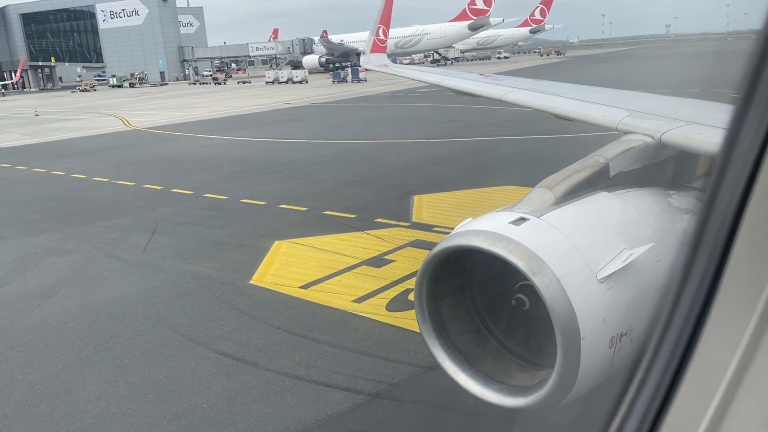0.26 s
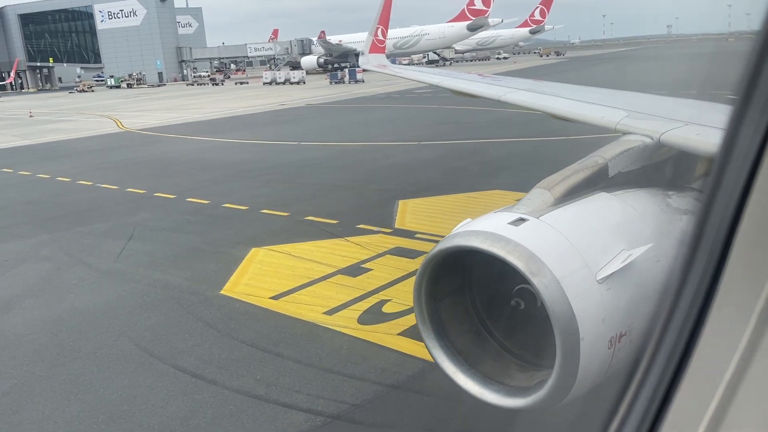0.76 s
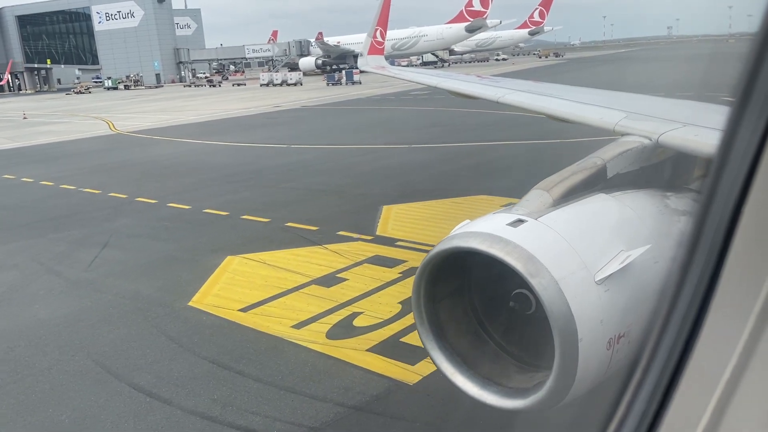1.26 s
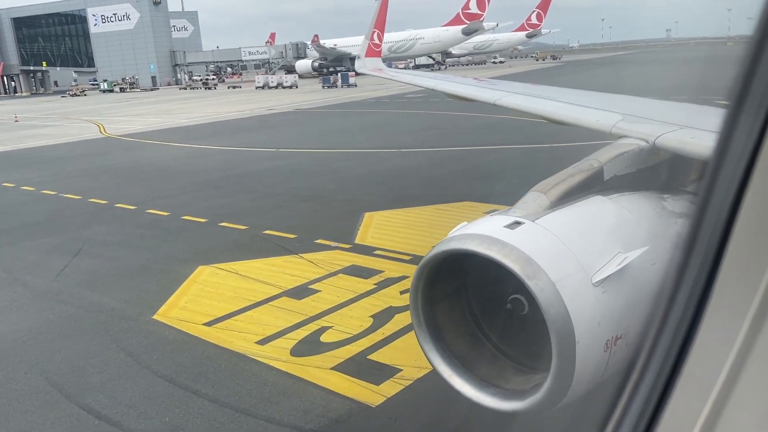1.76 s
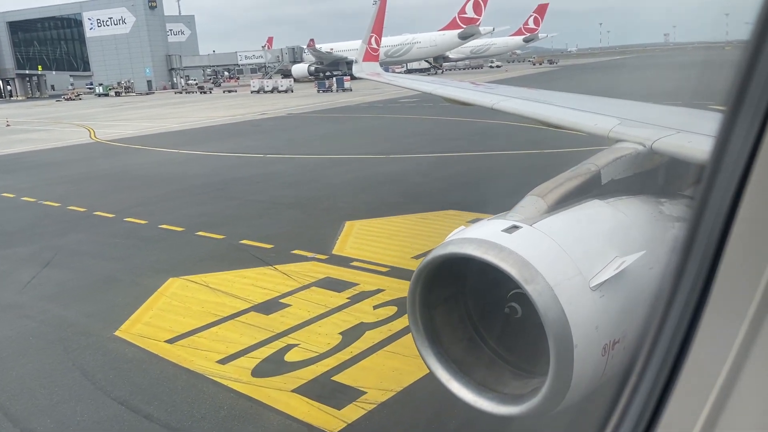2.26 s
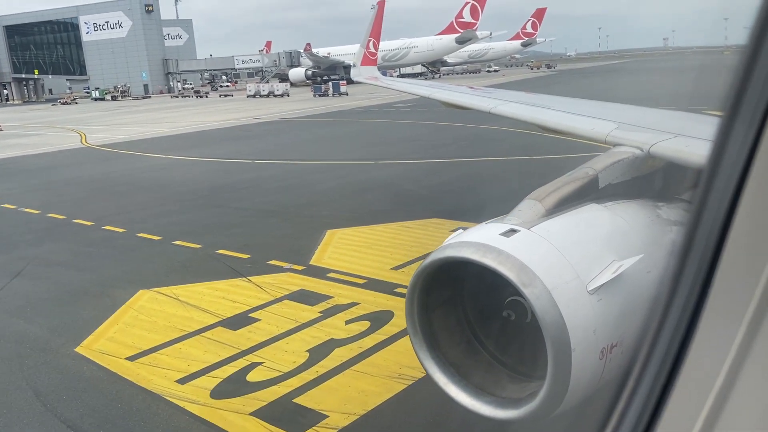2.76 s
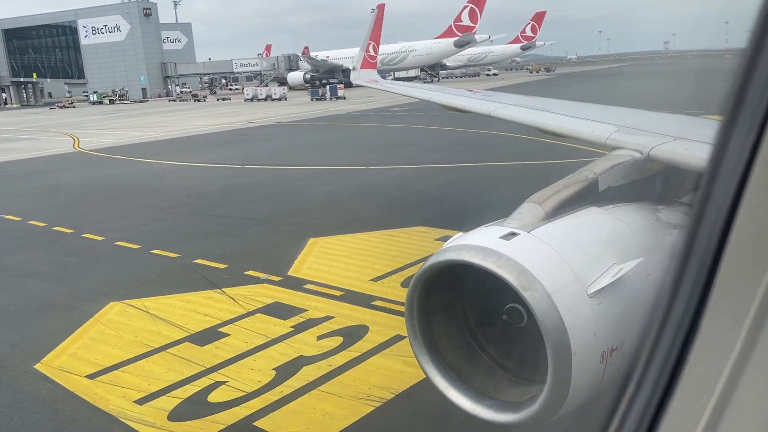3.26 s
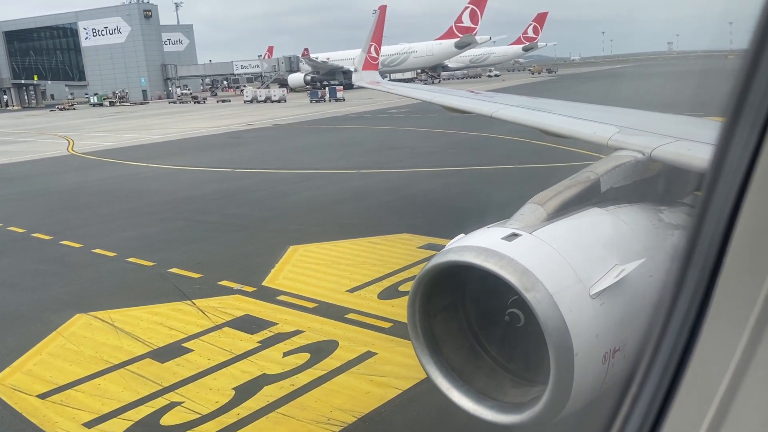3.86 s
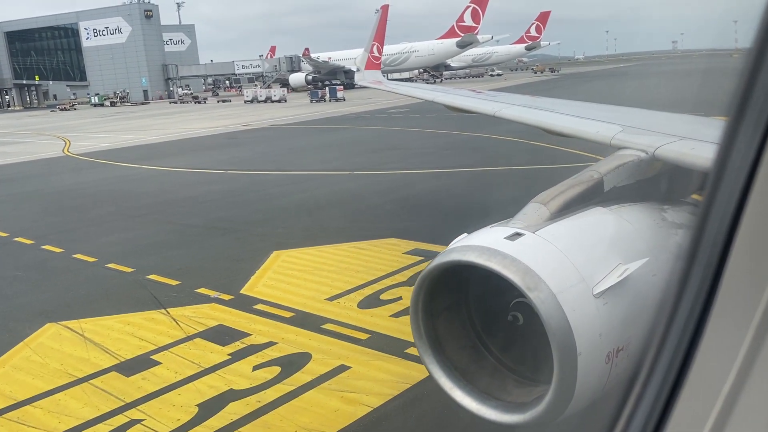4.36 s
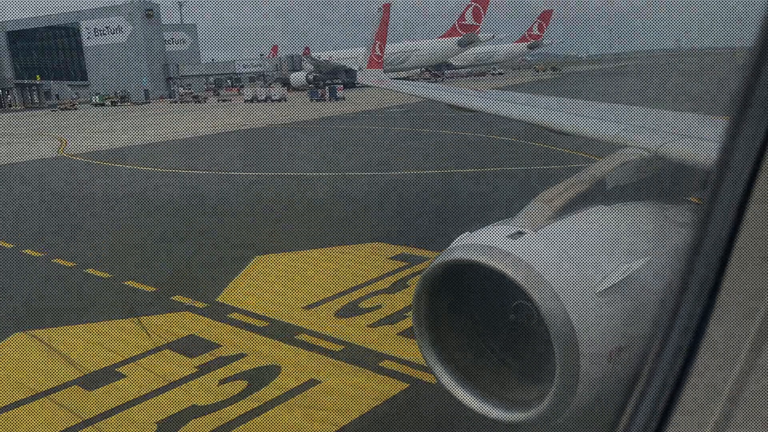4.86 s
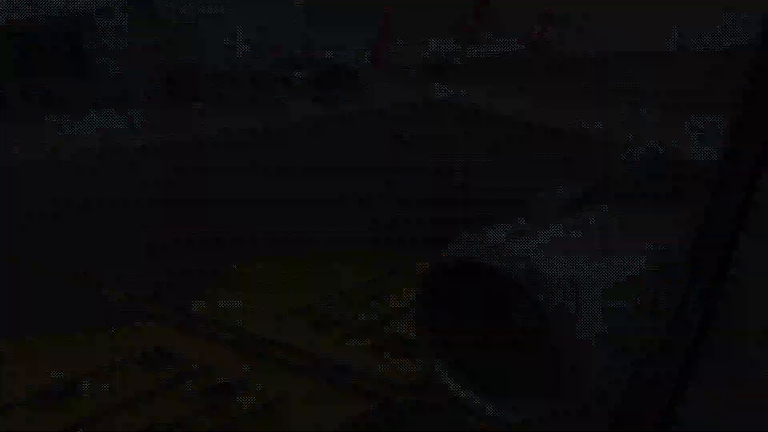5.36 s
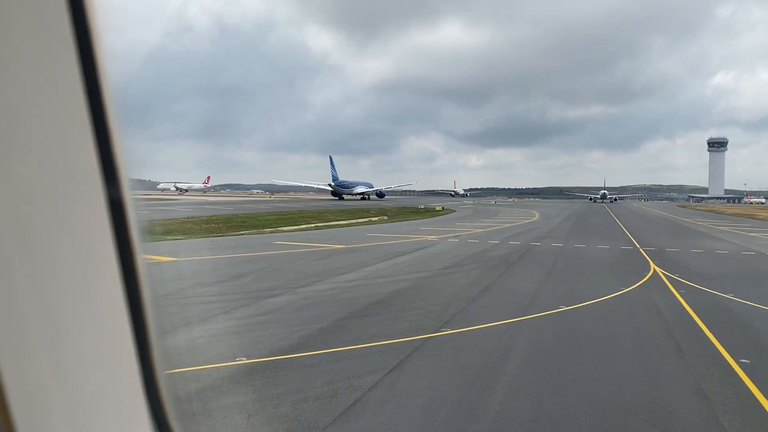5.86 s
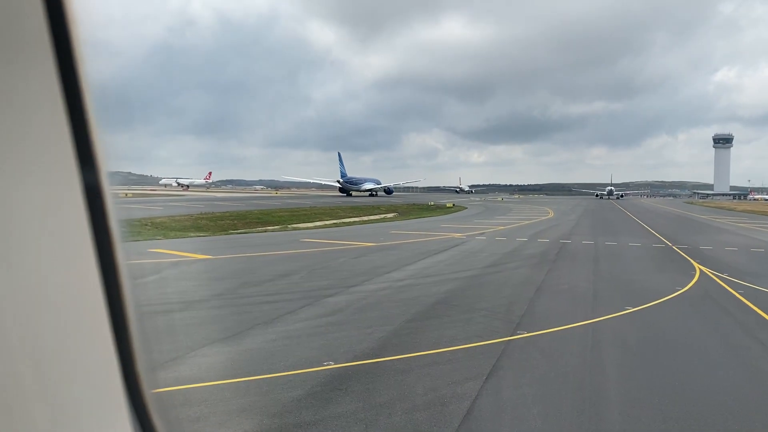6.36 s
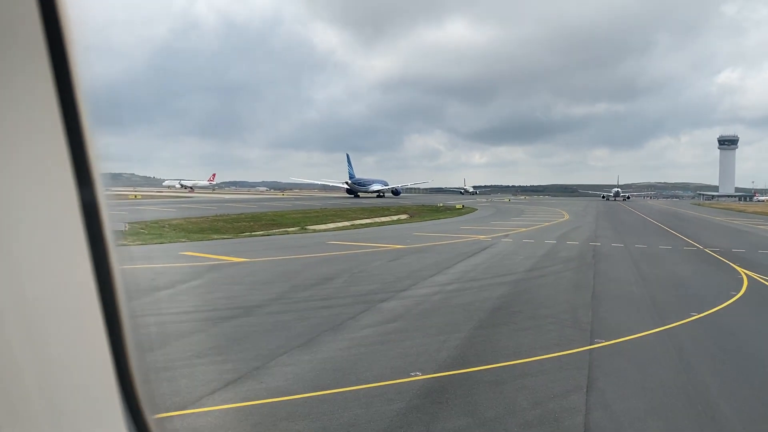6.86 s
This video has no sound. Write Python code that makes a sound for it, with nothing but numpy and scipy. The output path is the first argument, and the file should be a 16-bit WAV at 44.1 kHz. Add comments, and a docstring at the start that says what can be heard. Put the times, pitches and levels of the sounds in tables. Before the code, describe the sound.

From 0 to about 5.5 seconds we sit beside a jet engine inside a taxiing airliner. A deep throbbing hum creeps slightly upward in pitch beneath a resonant, steady roar, leaning left. Overhead air hisses with breathy whistles, and a thin high fan note shimmers. Light cloth rustles and tiny plastic ticks occur close by, with a sharper tick and knock at 1.8. A rough rush swells around 2.7 to 3.8, dips at 4.1, and partly returns. A loud cluster of clacks strikes at 4.7, with smaller knocks and a crisp rustle from 5.1 to 5.4. After a tiny silence at 5.5, a quieter seat appears: even tyre rumble, low hum and smoother vent hiss. Soft low jolts follow, knocks at 6.4 and 6.6, the deepest booms at 6.7 to 6.8, and a brief, very high squeak at 6.9.

```python
"""Two window seats in a taxiing jet airliner

First comes the seat by the engine, then after a tiny silent gap a quieter seat where the wheels rumble.
The engines' deep hum is made of sine tones; roar, rush, rumble and hissing air are coloured noise.
Fans and equipment whine as wavering sines, and bumps set off low notes that boom and die away.
Clacks, rustles and ticks are short bursts of noise; the trim's one squeak is a tone with a bending pitch."""
import sys
import numpy as np
from scipy import signal
from scipy.fft import rfft, irfft
from scipy.io import wavfile

SR = 44100
rng = np.random.default_rng(int(sys.argv[2]) if len(sys.argv) > 2 else 0)


def generate_wav(signal):
    """Clip the signal to [-1, 1] and save it as 16-bit WAV at the path in sys.argv[1]."""
    frames = np.transpose(np.atleast_2d(signal))
    scaled = np.clip(frames, -1, 1) * 32767
    pcm = np.round(scaled).astype(np.int16)
    wavfile.write(sys.argv[1], SR, pcm)


N = 313992
T = np.arange(N) / SR  # time in seconds
HZ = np.maximum(np.fft.rfftfreq(N, 1 / SR), 1)  # frequency of each spectrum bin

# how far the sound leans to the left ear at each seat: (pitch_hz, left_minus_right_db)
ENGINE_SEAT_LEAN = [(60, 2.01), (110, 2.98), (200, 4.8), (380, 2.78), (700, 6.97), (1290, 2.67),
                    (2380, 1.27), (4400, 2.9), (8120, 0.5), (15000, 0)]
QUIET_SEAT_LEAN = [(60, 3), (110, 1.5), (200, 2.5), (380, 3), (700, 0.5), (1290, -3), (2380, -2.5),
                   (4400, 0.5), (8120, 0), (15000, -3)]
# how alike the two ears are, 1 = same, below 0 = opposed: (pitch_hz, likeness)
ENGINE_SEAT_LIKENESS = [(60, 1), (130, 0.77), (290, 1), (640, 0.59), (1410, 0.01), (3100, 0.82),
                        (6820, 0.22), (15000, 0.28)]
QUIET_SEAT_LIKENESS = [(60, 0.94), (130, 1), (290, 0.81), (640, 0.23), (1410, -0.26), (3100, 0.11),
                       (6820, -0.056), (15000, -0.15)]


def undb(db):
    """Turn decibels into gain."""
    return 10 ** (np.asarray(db) / 20)


def unit(pair):
    """Scale a stereo pair so that the average of its two ears has rms 1."""
    return pair / np.std(pair.mean(axis=0))


def curves(rows):
    """Join the points of a time table by straight lines, one curve for each column."""
    seconds, *columns = np.transpose(rows)
    return [np.interp(T, seconds, column) for column in columns]


def across(points):
    """Spread a (pitch_hz, value) table over all frequencies."""
    hz, value = np.transpose(points)
    return np.interp(np.log(HZ), np.log(hz), value)


def pan(lean_db):
    """Give left and right gains for a level difference between the ears."""
    return undb(np.array([[1], [-1]]) * lean_db / 2)


def steep(edge_hz):
    """Give the gain of a steep low-pass, which is one half at its edge."""
    return 1 / (1 + (HZ / edge_hz) ** 8)


def walk(rate_hz):
    """Wander at random with spread 1, mostly slower than the given rate."""
    spectrum = rfft(rng.standard_normal(N)) / (1 + (HZ / rate_hz) ** 4)
    path = irfft(spectrum, N)
    return (path - path.mean()) / path.std()


def ripple(spacing_hz):
    """Draw a random curve over frequency with spread near 1, as many reflections make."""
    heights = rng.standard_normal(4096)
    return np.interp(HZ, spacing_hz * np.arange(len(heights)), heights)


def resonances(modes):
    """Add up the boost in dB that resonances (pitch_hz, width_hz, boost_db) give each frequency."""
    return sum(db / (1 + (2 * (HZ - hz) / width) ** 2) for hz, width, db in modes)


def noise(colour_db, likeness, lean_db=0):
    """Make coloured stereo noise; the ears differ by diffuse sound and by echoes of the shared sound."""
    mid, diffuse = rfft(rng.standard_normal((2, N)))
    echo_share = 0.75 * (1 - steep(500))  # the bass has no echoes
    echoes = mid * np.exp(1j * np.pi * ripple(150))
    side = np.sqrt(1 - echo_share) * diffuse + np.sqrt(echo_share) * echoes
    alike = np.clip(likeness, -.9, .997)
    pair = mid * np.sqrt(1 + alike) + np.array([[1], [-1]]) * side * np.sqrt(1 - alike)
    return unit(irfft(pair * undb(colour_db) * pan(lean_db), N))


def swell(start_s, rise_s, hold_s, t60_s):
    """Rise, hold, then die away by 60 dB in t60_s."""
    age = T - start_s
    fade_age = np.maximum(age - rise_s - hold_s, 0)
    return np.clip(age / rise_s, 0, 1) * np.exp(-np.log(1000) * fade_age / t60_s)


def tone(hz, level_db):
    """Make a sine that follows a pitch curve, at an rms level."""
    return np.sqrt(2) * np.sin(2 * np.pi * np.cumsum(hz) / SR) * undb(level_db)


def bursts(rows, colour_db, likeness, grain_db, ring_db, lean_db):
    """Dense tiny contacts merge into short uneven bursts that ring in many weak resonances."""
    body = colour_db + ring_db * ripple(110) + 20 * np.log10(1.001 - steep(300))
    out = 0
    for start_s, rise_s, hold_s, t60_s, level_db, tilt_db in rows:
        tilted = body + tilt_db * np.log2(HZ / 1000)  # dB per octave
        burst = noise(tilted, likeness, lean_db) * undb(level_db)
        out = out + burst * swell(start_s, rise_s, hold_s, t60_s)
    return out * undb(grain_db * walk(300))


def vents(colour_db, likeness, lean, flutter_db=0.68):
    """Air hisses from the overhead vents, combed by the walls and fluttering slightly."""
    # resonances of the air ducts: (pitch_hz, width_hz, boost_db)
    duct_modes = [(1650, 32, -6), (2150, 100, 1), (2770, 50, 2.5), (3570, 250, -3.5)]
    comb = .8 * ripple(22)
    no_bass = 20 * np.log10(1.001 - steep(460))
    shape = colour_db + resonances(duct_modes) + comb + no_bass
    return noise(shape, across(likeness), across(lean)) * undb(flutter_db * walk(13.0))


def engine_seat_air(surge_db, level_db=-47.5, follow=0.12):
    """By the engine the vents' hiss carries the compressor's breathy whistles and grows with the surge."""
    # colour of the hiss, before the whistles: (pitch_hz, relative_db_per_hz)
    hiss_colour = [(700, -15.5), (1300, 4.5), (1700, 2), (2150, 3.5), (2750, -2.5), (3400, -8.5),
                   (4200, -10), (5200, -13.5), (6700, -23), (8200, -25.5), (11500, -27.5), (16000, -39)]
    # whistles of the near engine's compressor: (pitch_hz, width_hz, boost_db)
    compressor_modes = [(3580, 30, 6.5), (3630, 28, 3), (6029, 40, 2.5), (6280, 49, 5), (6680, 60, 5.5)]
    colour = across(hiss_colour) + resonances(compressor_modes)
    air_db = level_db + follow * (surge_db - surge_db.mean())  # follow: dB of hiss per dB of surge
    return undb(air_db) * vents(colour, ENGINE_SEAT_LIKENESS, ENGINE_SEAT_LEAN)


def quiet_seat_air(level_db=-45):
    """At the quieter seat the vents hiss at a steady level apart from their flutter."""
    # colour of the hiss: (pitch_hz, relative_db_per_hz)
    hiss_colour = [(600, 7), (1300, 0), (1900, -1), (2400, 0), (3400, -8.5), (4400, -10.5), (5600, -15.5),
                   (7200, -20), (8500, -21), (11500, -27.5), (16000, -32)]
    return undb(level_db) * vents(across(hiss_colour), QUIET_SEAT_LIKENESS, QUIET_SEAT_LEAN)


def whine(tones, lift_db=0, waver_db=-1.0, drift=.0006):
    """Fans and pumps hold steady tones; each fades in and out on its own at each ear."""
    out = 0
    speed = 1 + drift * walk(6)  # all tones drift together
    for hz, level_db in tones:
        phase = 2 * np.pi * np.cumsum(hz * speed) / SR + rng.uniform(-1.2, 1, (2, 1))
        fading = waver_db * np.array([walk(3.6), walk(2.7)])
        out = out + np.sqrt(2) * np.sin(phase) * undb(level_db + lift_db + fading)
    return out


def engine_seat_whine():
    """Four thin tones waver strongly at the seat by the engine."""
    # (pitch_hz, level_db)
    whine_tones = [(2254, -63.5), (4902, -82.5), (5846, -82.5), (6640, -81.5)]
    return whine(whine_tones, waver_db=5)


def quiet_seat_whine():
    """Low and high tones waver gently at the quieter seat."""
    # (pitch_hz, level_db before a shared lift)
    whine_tones = [(150.7, -37), (359.5, -42), (1428, -70), (1809, -69), (2476, -63.5), (4624, -74),
                   (5835, -80.5), (6638, -78)]
    return whine(whine_tones, lift_db=2.0)


def fan(second_db=-7, lean_db=5, flutter_db=2.5, waver_hz=8):
    """Two cabin fans sing almost the same thin note, so it shimmers at both seats."""
    # level of the stronger fan, before its flutter: (time_s, level_db)
    fan_level = [(0, -67), (2.2, -68.5), (3.7, -67.5), (4.15, -66), (5.4, -68.5), (5.75, -74), (5.85, -61),
                 (6.17, -76), (6.35, -65), (6.53, -61), (6.7, -65), (7.1, -77)]
    pitch_hz, beat_hz = 3895, 4.2
    level_db, = curves(fan_level)
    hz = pitch_hz + waver_hz * walk(20)
    second_hz = hz + beat_hz + walk(1.3)
    both = tone(hz, level_db) + tone(second_hz, level_db + second_db)
    return both * undb(flutter_db * walk(16)) * pan(lean_db)


def rustles(catch_db=1.5, rise_share=0.27, tail_ratio=3.7):
    """Cloth shifts, catching and slipping; longer movements start and settle more slowly."""
    # movements of the cloth: (start_s, length_s, level_db, tilt_db_per_octave)
    movements = [(0.102, .22, -70.5, -3), (1.06, 0.074, -66, 1), (1.84, 0.038, -64, -4),
                 (2.089, 0.061, -60, 5), (2.38, .045, -59.5, -3), (2.465, 0.045, -53.5, -3),
                 (2.603, .02, -62, 1), (3.197, 0.11, -59.5, -2), (3.49, .06, -64, 2), (3.78, 0.13, -59, -1),
                 (4.136, .15, -63, -1), (4.499, 0.064, -63, -6), (4.642, 0.065, -62.5, -2),
                 (4.812, 0.064, -57, 8), (5.362, .05, -50, 10), (6.002, 0.48, -64.5, -0.5)]
    # colour before the tilt: (pitch_hz, relative_db_per_hz)
    cloth_colour = [(1500, -22.5), (3000, 3), (6400, 8), (8500, 1), (11300, 7), (13000, -1), (16000, -9.5)]
    rows = []
    for start_s, length_s, level_db, tilt_db in movements:
        rise_s, hold_s = rise_share * length_s, (1 - rise_share) * length_s
        rows.append((start_s, rise_s, hold_s, tail_ratio * length_s, level_db, tilt_db))
    cloth = bursts(rows, across(cloth_colour), likeness=.3, grain_db=2.0, ring_db=4.5, lean_db=0.0)
    return cloth * undb(catch_db * walk(45))


def ticks(t60_s=0.014):
    """Plastic panels shift with tiny dry cracks."""
    # (start_s, level_db)
    crack_times = [(.285, -52), (1.13, -48.5), (1.832, -39), (2.212, -47), (2.606, -42.5), (2.668, -58),
                   (3.545, -50), (6.504, -47)]
    # (pitch_hz, relative_db_per_hz)
    crack_colour = [(800, -9), (2000, 5), (6000, -4.5), (9000, -4), (16000, -9.5)]
    cracks = sum(undb(level_db) * swell(start_s, 0.00034, .0005, t60_s)
                 for start_s, level_db in crack_times)
    return cracks * noise(across(crack_colour), .3)


def squeak(rise_s=0.013, t60_s=.3, jitter_hz=90):
    """Trim rubs briefly with a thin, unsteady note that sags, then climbs as it fades."""
    start_s, length_s, level_db = 6.905, 0.11, -51
    low_hz, low_after_s, bend_hz_per_s2 = 10430, .04, 210000
    age = np.clip(T - start_s, 0, length_s)
    hz = low_hz + bend_hz_per_s2 * (age - low_after_s) ** 2 + jitter_hz * walk(300)
    release = np.clip((length_s - age) / rise_s, 0, 1)
    return tone(hz, level_db) * swell(start_s, rise_s, rise_s, t60_s) * release


def clacks():
    """Loose fittings knock together and ring in their own resonances; the soft, dull bursts at 6.44, 6.6 and
    7.03 s are cloth rustling."""
    # (start_s, rise_s, hold_s, t60_s, level_db, tilt_db_per_octave)
    knocks = [(1.831, .002, 0.0038, 0.086, -37, -4), (4.721, 0.0046, 0.003, 0.2, -26, 0.5),
              (4.733, 0.0047, 0.012, 0.091, -25.5, -1.5), (4.75, 0.0035, .007, 0.16, -28.5, -0.5),
              (4.774, .003, 0.015, 0.36, -35, -1.5), (4.792, .002, .005, .06, -40, -3),
              (5.1, .014, 0.023, 0.25, -42.5, 0.5), (5.329, 0.0026, 0.0059, 0.48, -37, 2.5),
              (5.372, 0.011, .02, 0.19, -39.5, 2.5), (5.399, 0.0017, 0.0016, 0.041, -35, 0),
              (5.434, 0.0018, .003, .08, -39, -1), (6.438, 0.0033, .012, .08, -37, -3.5),
              (6.6, 0.011, 0.043, 0.15, -41, -4.5), (7.03, 0.0081, 0.041, .2, -52, 0)]
    # colour before the ringing and the tilt: (pitch_hz, relative_db_per_hz)
    knock_colour = [(300, -3), (550, 5.5), (900, -3), (1250, 0.5), (2100, -4), (3000, -7), (3700, -8.5),
                    (4600, -12.5), (6600, -18.5), (8500, -23), (11500, -24), (16000, -39)]
    # what the fittings ring with: (pitch_hz, width_hz, boost_db)
    fitting_modes = [(567, 60, 8), (870, 160, 8.5), (1940, 200, 2), (2650, 200, 3.5), (3680, 250, 0),
                     (5250, 250, 3.5), (6330, 560, 2)]
    colour = across(knock_colour) + resonances(fitting_modes)
    return bursts(knocks, colour, likeness=.2, grain_db=1.5, ring_db=2.0, lean_db=0.5)


def bumps(lean_db=3.0, rise_s=0.035, t60_s=0.27):
    """Each joint in the taxiway sets one of the hull's low modes swinging."""
    # (start_s, hold_s, pitch_hz, level_db)
    jolts = [(3.059, 0.026, 48, -24.5), (5.525, 0.014, 164, -26.5), (5.73, 0.009, 148.8, -27),
             (5.957, 0.068, 57, -28), (6.06, 0.039, 150.5, -24), (6.46, 0.014, 153.7, -24.5),
             (6.602, 0.033, 65.5, -25), (6.63, 0.039, 148.1, -25), (6.732, 0.042, 61.2, -14),
             (6.811, .035, 60.2, -14.3), (6.949, .06, 56.8, -21.5), (7.005, .012, 139.6, -26)]
    booms = 0
    for start_s, hold_s, hz, level_db in jolts:
        swing = np.sin(2 * np.pi * hz * (T - start_s))
        booms = booms + undb(level_db) * swell(start_s, rise_s, hold_s, t60_s) * swing
    return np.sqrt(2) * booms * pan(lean_db)


def wheels(level_db=-23, bass_waver_db=-0.14):
    """Tyres on concrete rumble evenly up through the landing gear."""
    # rumble before the resonances: (pitch_hz, relative_db_per_hz)
    roll_colour = [(22, -33), (40, -4), (60, 4.5), (80, -4), (105, -4), (150, -5), (180, -7), (250, -11),
                   (330, -13), (420, -17), (530, -15.5), (750, -26), (1000, -31), (1400, -51)]
    # cabin resonances at the quieter seat: (pitch_hz, width_hz, boost_db)
    quiet_cabin_modes = [(142, 14, 5.5), (203, 28, 2.5), (430, 27, 3.5), (469, 30, 3.5), (520, 22, 2),
                         (635, 25, 6.5)]
    colour = across(roll_colour) + resonances(quiet_cabin_modes) + 20 * np.log10(steep(1700))
    roll = noise(colour, across(QUIET_SEAT_LIKENESS), across(QUIET_SEAT_LEAN)) * undb(level_db)
    bass = irfft(rfft(roll) * steep(220), N)
    return roll + bass * (undb(bass_waver_db * walk(4.8)) - 1)  # the bass wavers very slightly


def surge(level_db, rough_db=0.95, extra_lean_db=3.0):
    """A broader, rougher rush comes and goes, filling in between the cabin's resonances."""
    # (pitch_hz, relative_db_per_hz)
    rush_colour = [(60, -27), (110, -12), (185, -3), (250, -9.5), (340, 0.5), (425, 0.5), (485, -10.5),
                   (720, -11), (790, -15.5), (980, -13.5), (1100, -27.5), (1700, -36.5)]
    colour = across(rush_colour) + 20 * np.log10(steep(1700))
    lean_db = across(ENGINE_SEAT_LEAN) + extra_lean_db
    rush = noise(colour, across(ENGINE_SEAT_LIKENESS), lean_db)
    return rush * undb(level_db + rough_db * walk(27))


def roar(deep_db=-24.5, body_db=-22.5, upper_db=-29, waver_db=0.3):
    """Exhaust turbulence rings the cabin; its bass, body and upper part each waver on their own."""
    # roar before the resonances: (pitch_hz, relative_db_per_hz)
    roar_colour = [(25, -24), (38, -18), (50, -0.5), (75, -1.5), (100, 0), (120, -6.5), (170, -2.5),
                   (250, -1.5), (340, -3.5), (430, -5.5), (520, -16.5), (780, -20.5), (1100, -28),
                   (1500, -39)]
    # cabin resonances that the roar excites: (pitch_hz, width_hz, boost_db)
    cabin_modes = [(50.7, 4.3, 5.5), (96.5, 5.2, 2), (142.3, 10, 12), (195.5, 11, 3), (231, 15, 4),
                   (248.1, 49, 7.5), (287.2, 19.5, 10), (308.3, 15, -12), (332.4, 15, 6), (362, 15, 4),
                   (386.4, 13, -5), (403.3, 4.8, 4.5), (424.5, 18, 2.5), (475.6, 36, 5.5), (532.4, 28, 8.5),
                   (643, 36, 7), (780, 16, -4), (873, 57, 8.5), (986, 35, 6.5), (1146, 31, 4.5),
                   (1272, 63, 9)]
    colour = across(roar_colour) + resonances(cabin_modes) + 20 * np.log10(steep(1500))
    air = rfft(noise(colour, across(ENGINE_SEAT_LIKENESS), across(ENGINE_SEAT_LEAN)))
    below_body, below_upper = steep(178.5), steep(341.3)
    parts = [(below_body, deep_db), (below_upper - below_body, body_db), (1 - below_upper, upper_db)]
    out = 0
    for share, level_db in parts:
        out = out + unit(irfft(air * share, N)) * undb(level_db + waver_db * walk(2.2))
    return out


def hum(lean_db=2.5, waver_hz=0.44):
    """Both engines shake the hull with a deep tone; their speeds differ a little, so the hum throbs."""
    # the near engine creeps up in speed, and its hum dips briefly: (time_s, pitch_hz, level_db)
    near_engine = [(0, 65, -21.5), (1.6, 65.5, -20.5), (2.25, 65.8, -17.5), (2.5, 66.66, -18.5),
                   (3.2, 67.6, -21), (4.0, 68.16, -21.5), (4.12, 68.8, -30), (4.28, 69.16, -18.5),
                   (4.68, 69.6, -23), (4.85, 69, -20), (5.5, 71, -21.5)]
    far_hz, far_db = 65.3, -36  # the far engine stays near this speed
    near_hz, near_db = curves(near_engine)
    drift_hz = waver_hz * walk(3.6)  # shared by both
    both = tone(near_hz + drift_hz, near_db) + tone(far_hz + drift_hz, far_db)
    return both * pan(lean_db)


def scene():
    """Play the seat by the engine, a moment of silence, then the quieter seat."""
    # level of the surging rush, before its roughness: (time_s, level_db)
    surge_level = [(0, -32), (1.4, -37), (1.85, -32.5), (2.45, -34), (2.75, -25.5), (3.15, -22),
                   (3.45, -23), (3.8, -22), (4.1, -36), (4.4, -26), (4.75, -29), (5.25, -32), (5.49, -32)]
    leave_s, arrive_s = 5.4909, 5.5158
    surge_db, = curves(surge_level)
    engine_seat = engine_seat_air(surge_db) + engine_seat_whine() + surge(surge_db) + roar() + hum()
    quiet_seat = quiet_seat_air() + quiet_seat_whine() + wheels()
    both_seats = fan() + rustles() + ticks() + squeak() + clacks() + bumps()
    before_gap = (engine_seat + both_seats) * (T < leave_s)
    after_gap = (quiet_seat + both_seats) * (T > arrive_s)
    return before_gap + after_gap


def record(dry):
    """The treble is hollow in two places and ends near 16 kHz."""
    # dips in the treble, each applied twice: (pitch_hz, width_hz of one pass)
    treble_dips = [(9050, 1500), (13200, 1000)]
    top_hz = 15900
    heard = dry
    for hz, width in treble_dips:
        notch = signal.iirnotch(hz, hz / width, fs=SR)
        heard = signal.lfilter(*notch, heard)
        heard = signal.lfilter(*notch, heard)
    low_pass = signal.ellip(8, .2, 80, top_hz, fs=SR, output="sos")
    return signal.sosfilt(low_pass, heard)


dry = scene()
out = record(dry)
generate_wav(out)
```